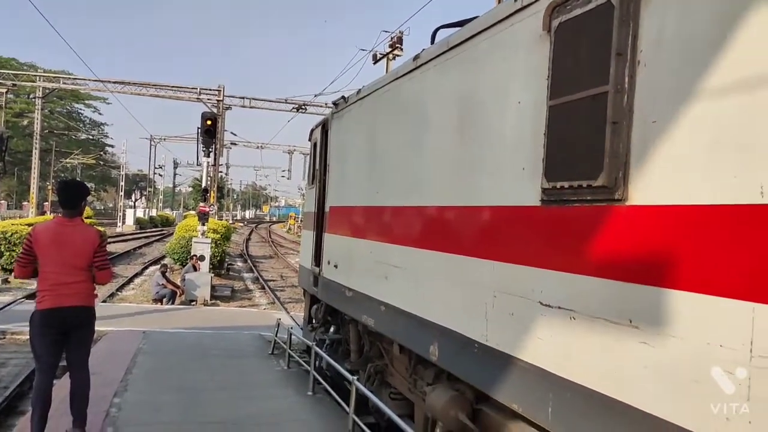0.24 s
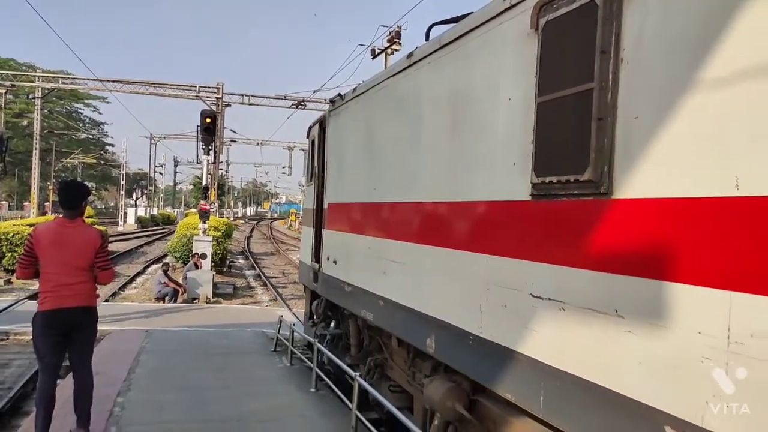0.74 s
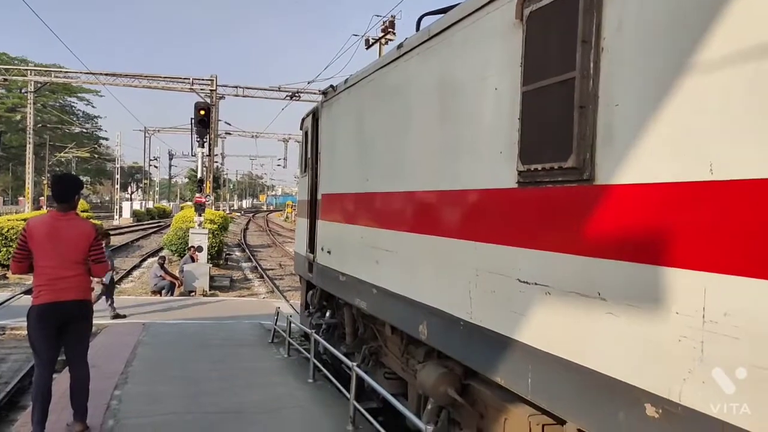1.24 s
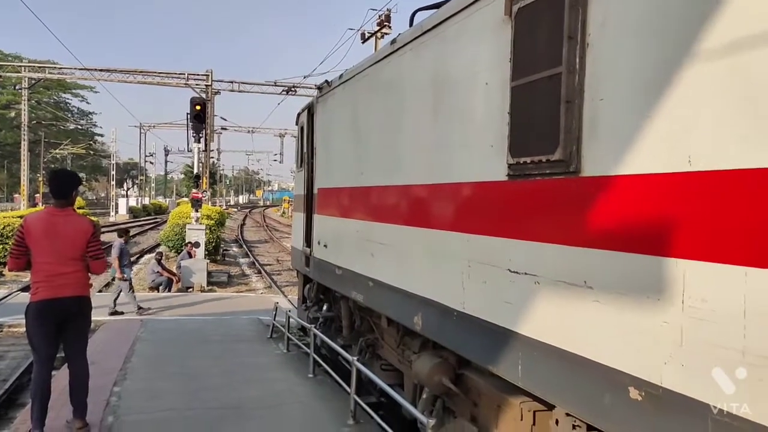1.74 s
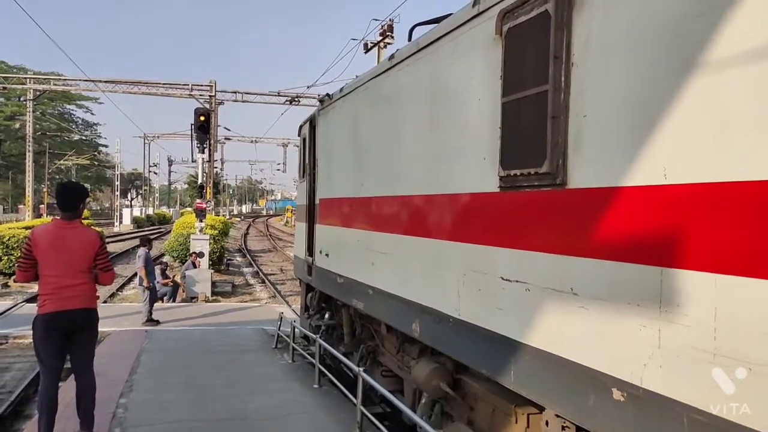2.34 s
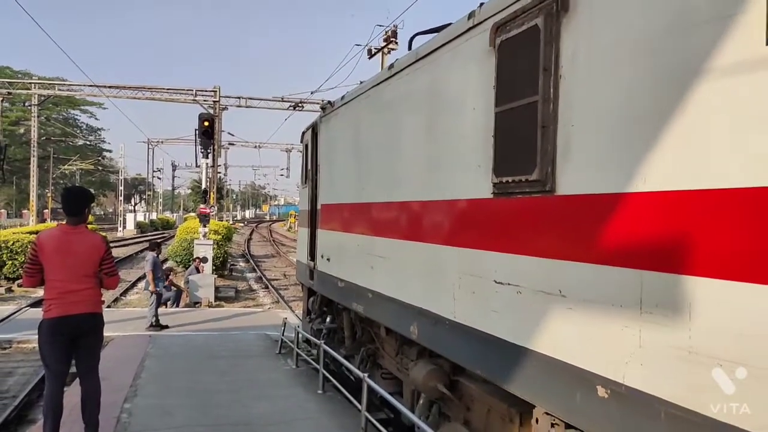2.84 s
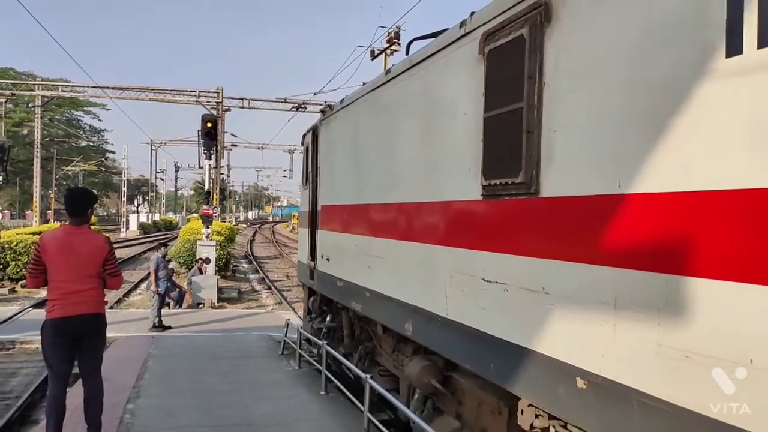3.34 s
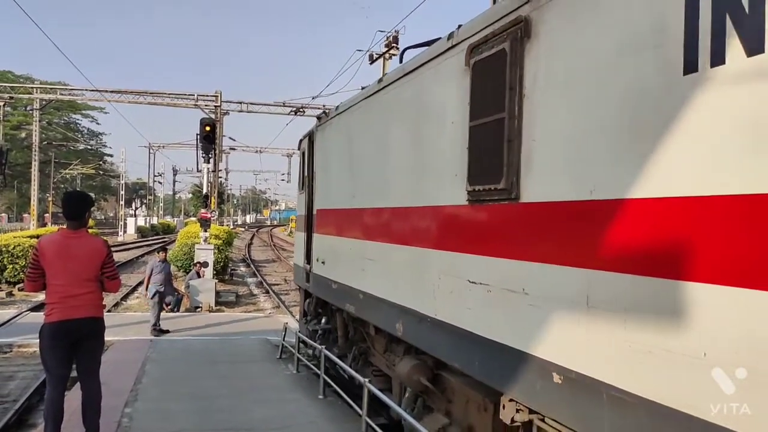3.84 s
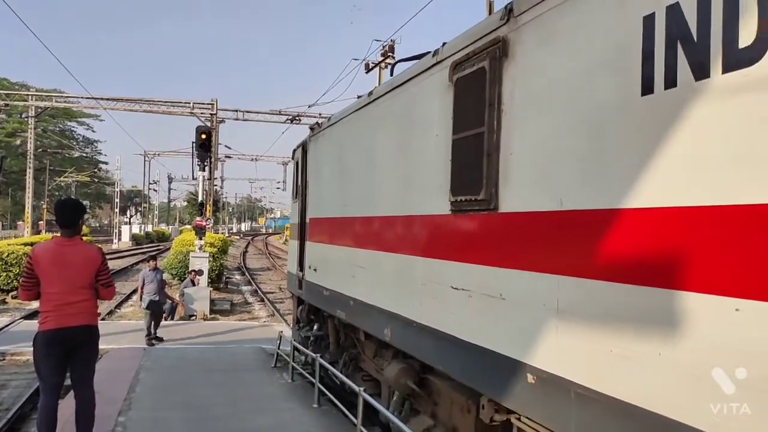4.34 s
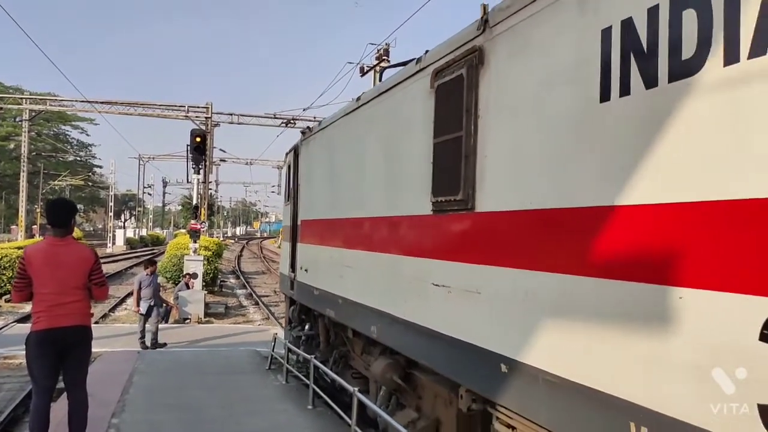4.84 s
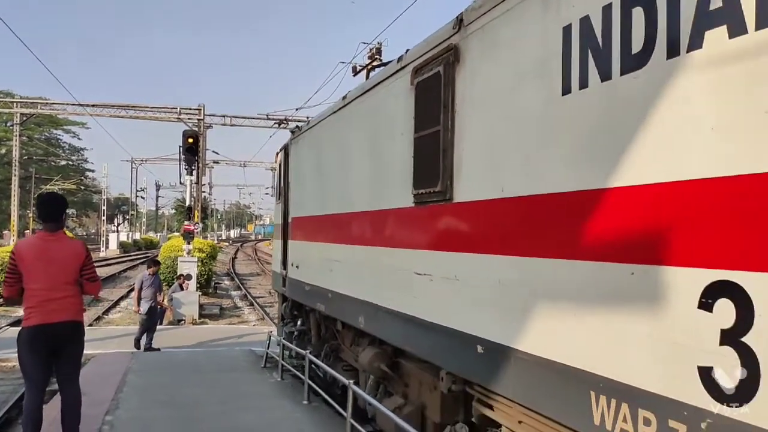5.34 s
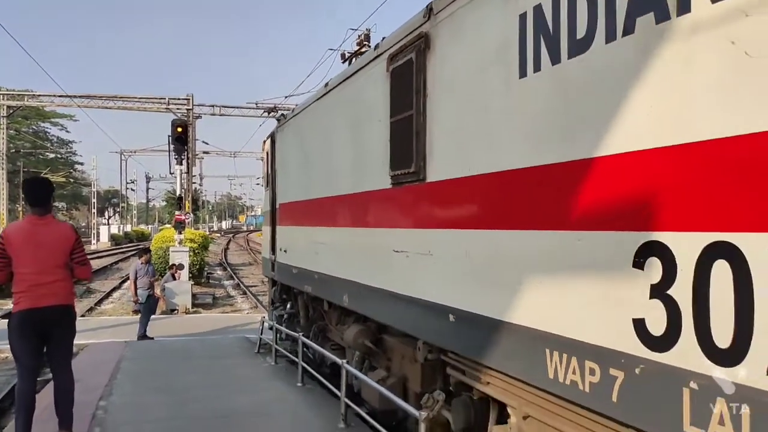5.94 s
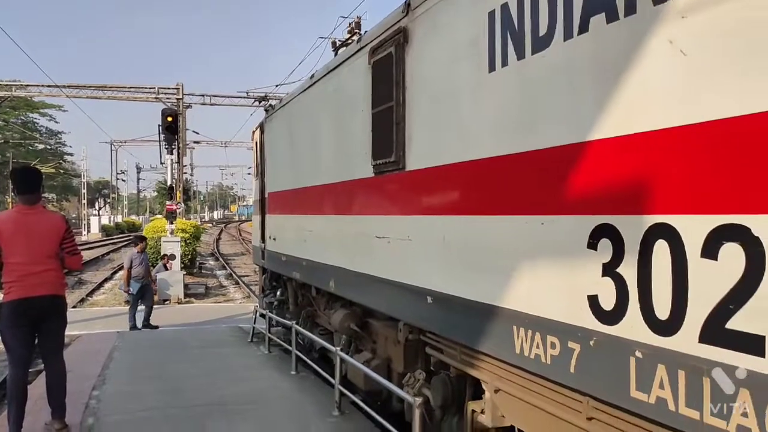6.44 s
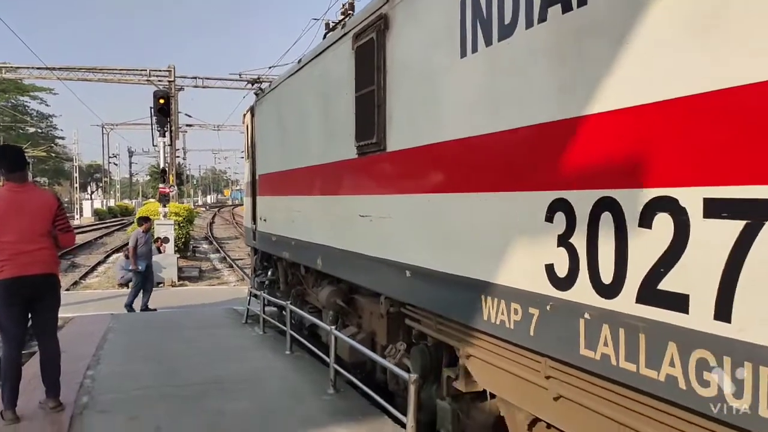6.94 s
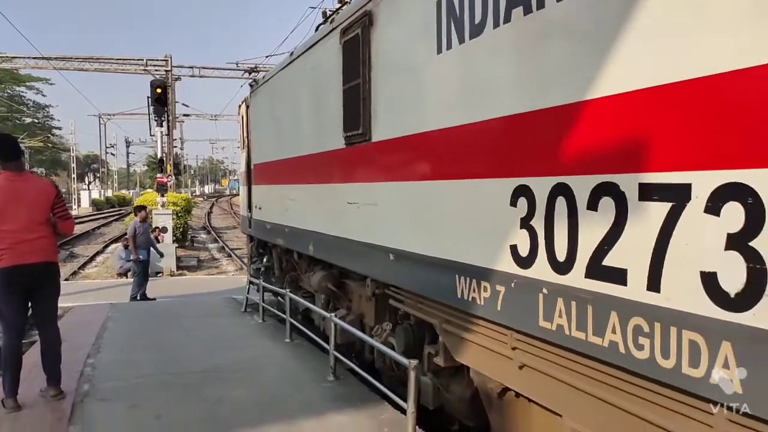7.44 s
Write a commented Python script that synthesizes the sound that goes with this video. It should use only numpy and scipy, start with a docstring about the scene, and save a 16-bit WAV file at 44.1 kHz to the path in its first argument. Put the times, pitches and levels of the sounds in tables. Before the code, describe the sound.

An electric locomotive rolls slowly by at arm's length, its cooling fans rushing and humming steadily, interrupted once by a brief spit of brake air.

```python
"""Blowers of an electric locomotive creeping past a platform, an arm's length away, in the open air.
They roar as coloured noise, with one wavering sine per blower for the blade tones.
Transformer and converter buzz on multiples of about 100 Hz; thin sine whistles lie above.
Brake pipework, in gated noise, leaks a swelling hiss, then spits one short puff.
A faint low rumble lies underneath."""
import sys
import numpy as np
from scipy import signal
from scipy.fft import rfft, irfft, next_fast_len
from scipy.io import wavfile

SR = 44100
rng = np.random.default_rng(int(sys.argv[2]) if len(sys.argv) > 2 else 0)


def dump(signal):
    """Clip the signal to [-1, 1] and save it as 16-bit WAV at the path in sys.argv[1]."""
    limited = np.clip(np.atleast_2d(signal).T, -1, 1)
    pcm = np.round(limited * 32767).astype(np.int16)
    wavfile.write(sys.argv[1], SR, pcm)


N = 338952
TIME = np.arange(N) / SR
SIZE = next_fast_len(N)
FREQS = np.maximum(np.arange(SIZE // 2 + 1) * SR / SIZE, 1)

# Noise spectra, scaled to rms 1 on use: freq_hz, relative_db_per_hz
# duct roar, grille rush, nearer outlet
ROAR_SPECTRUM = [(140, -62), (200, -43.5), (232, -30), (262, -17.5), (300, -6.5), (338, 1), (358, -1.6),
                 (392, -2.4), (440, -2.4), (500, -3.7), (580, -6.8), (650, -7), (730, -9.5), (950, -14.5),
                 (1600, -23.5), (4000, -60)]
RUSH_SPECTRUM = [(250, -40), (600, -2), (1000, 0), (1400, 0.4), (2000, -2.9), (2500, -9), (3000, -13),
                 (3500, -16.8), (4150, -15.9), (5300, -24.5), (7000, -17.3), (9500, -27.5), (12500, -34),
                 (15000, -29.5)]
OUTLET_SPECTRUM = [(160, -53), (290, -5), (368, 9.5), (410, 4), (700, -9.5), (1200, -16), (2200, 0.7),
                   (2800, -2), (3400, -8.5), (4200, -10), (5100, -26.5), (6700, -10), (9500, -25.5),
                   (15000, -44)]
# narrow duct resonance, brief roar surge
DUCT_MODE_SPECTRUM = [(200, -90), (310, -30), (350, -10), (368, 0), (385, -10), (450, -30), (1200, -100)]
SURGE_SPECTRUM = [(150, -80), (280, -12), (350, 0), (430, -1), (560, -12), (1000, -35), (3000, -85)]
# brake air: leak, its thin jet, puff, duller tail of the puff
LEAK_SPECTRUM = [(300, -70), (1700, -25), (2700, -1), (4000, -9), (5300, -13), (6500, -8), (7200, 2.5),
                 (8100, -2), (9000, -11), (12000, -19), (15000, -16.5)]
LEAK_JET_SPECTRUM = [(2000, -40), (5500, -8), (7500, 3), (9500, -2), (12000, -3), (15000, 2)]
PUFF_SPECTRUM = [(200, -60), (800, 0), (1400, 2), (2100, 5), (3400, -3.5), (4300, -1), (5200, -11),
                 (6400, -2), (7400, 4), (9500, -7.5), (12500, -10), (14000, -3.8), (14900, -.5),
                 (15700, -4)]
PUFF_TAIL_SPECTRUM = [(150, -60), (750, 0), (1400, 1), (2000, 6), (2500, 2.7), (3000, -1.5), (4300, -5.5),
                      (5200, -12), (6200, -6), (6800, -0.5), (8000, -8), (9500, -14), (12000, -19),
                      (15000, -22)]
# background rumble
RUMBLE_SPECTRUM = [(20, 3), (150, 0), (400, -20), (2000, -60)]

# Stereo pickup of noise: freq_hz, coherence (0-1)
COHERENCE = [(60, 0.97), (260, 0.95), (400, 0.69), (700, 0.6), (1200, 0.76), (1700, 0), (3000, 0),
             (5300, 0.3), (6500, 0.53), (8200, .9), (11000, 0.56), (14000, .1)]
# Stereo pickup of noise: freq_hz, left_minus_right_db
BALANCE = [(200, 0), (350, 1), (550, 0.8), (1000, 0.6), (1800, 6), (2500, 0.5), (3200, -4), (4300, 3),
           (5500, 0.5), (6500, 2.5), (7700, -2.5), (10000, 1), (12500, 1.5), (14500, 9)]

# Ducts and their resonance drawing level: nearest_s, peak_db, half_power_s
ROAR_PASS = (6.6, -26.6, 1.05)
DUCT_PASS = (6.25, -31.5, .6)
# Brief surges of the roar: peak_s, peak_db, half_power_s
SURGES = [(0.65, -32, .18), (6.14, -25.5, .025), (7.43, -23, .035)]

# Nearest blower's hum: time_s, level_db (before trim), left_minus_right_db, left_lead_rad
HUM_CURVE = [(0, -31, -5, 1.2), (0.3, -27, -4, 1.1), (0.48, -29.3, -4, 1.2), (0.85, -22.8, -2, 1.3),
             (1.1, -30, -2, 1.4), (1.4, -26.7, -1, 1.4), (1.55, -29, -1, 1.4), (1.73, -26.7, -1, 1.5),
             (2.1, -26.5, -1, 1.4), (2.3, -28.5, -1, 1.5), (2.64, -29.3, -4, 1.6), (2.87, -43, 0, 1.2),
             (3.23, -32, 1, .6), (3.33, -35, 2, .7), (3.43, -27.3, 3, 1), (3.6, -34, -1, .6),
             (3.8, -34, 1, .6), (3.97, -50, 0, 1.5), (4.5, -34, -5, .9), (4.68, -41, -4, .9),
             (4.8, -33, 0, 1.4), (5.1, -37, 4, 1.9), (5.78, -38, 2, 1.6), (5.88, -29.3, 0, 1.1),
             (6.12, -29.5, 0, 1.2), (6.3, -46, 0, 1.4), (6.8, -32, -3, 1.7), (7.3, -39, 2, .8),
             (7.65, -34, 2, .3)]
# Lowest blower's drone: time_s, level_db (before trim)
DRONE_CURVE = [(0, -43), (2.0, -54), (2.8, -38), (3.3, -36.5), (3.9, -38), (4.2, -46), (4.55, -38),
               (4.85, -33.8), (5.12, -32.3), (5.21, -34.5), (5.32, -31.5), (5.65, -30.5), (6.35, -38),
               (6.55, -33.5), (6.85, -31.3), (7.25, -38), (7.65, -38)]
# Blade tones of two more blowers: pitch_hz, left_minus_right_db, left_lead_rad
FANS = [(419.9, .2, .4), (440.2, 2.5, .4)]
# Their passes: nearest_s, peak_db (before trim), half_power_s, lobe_spacing_s, lobe_depth_db
FAN_PASSES = [(7.07, -29.5, 1.96, 2.57, 6.5), (6.3, -33.5, 5.7, 1.05, 5)]

# Magnetic buzz: multiples of twice the line frequency
BUZZ_ORDERS = [6, 7, 9, 11, 12, 13, 14, 15, 16, 17, 18, 19, 20, 21, 22, 23, 24, 25, 26, 30, 35]
# Their levels: level_db (before approach gain)
BUZZ_LEVELS = [-53, -54, -54, -57, -55, -57, -55.5, -57.5, -54.5, -56.5, -59, -57, -51.5, -52, -59, -58,
               -60, -59.5, -62.5, -61.5, -70]
# Strongest transformer harmonic: time_s, level_db, left_lead_rad
WHINE_CURVE = [(0, -50, 1.1), (.8, -54, 2.3), (1.3, -45.5, 2), (1.7, -47, 1.9), (1.9, -43.5, 1.4),
               (2.17, -40.5, 1.1), (2.45, -47, 1.6), (2.75, -44.5, 2.5), (3.1, -49, 2.4), (3.5, -42.5, 2),
               (4.3, -45, 2.6), (4.8, -52, 2.5), (5.3, -44.5, 2.5), (5.95, -48, 2.4), (6.42, -39.3, 1.6),
               (6.65, -42, 2.2), (6.82, -38, 2.7), (7.3, -37, 2.4), (7.65, -37.5, 2.6)]
# Power-electronics whistles: pitch_hz, phase_wander_rad, level_db (before approach gain)
WHISTLES = [(4001, 1.7, -67.5), (4997, 2.2, -71), (5996, 1.8, -72), (6997, 1.5, -70), (13996, 4, -83),
            (14995, 6, -79)]

# Brake air flows: opens_s, rise_s, hold_s, peak_db, fall_db_per_s
LEAK_FLOW = (1.58, .84, .05, -38, 240)
LEAK_JET_FLOW = (2.268, .012, .19, -47, 220)
PUFF_FLOW = (2.684, .062, .014, -27.4, 235)
PUFF_TAIL_FLOW = (2.715, .076, 0.022, -26.9, 145)
# Valve bore ringing: peak_s, half_power_s, pitch_hz, width_hz, peak_db, left_minus_right_db
PUFF_RINGS = [(2.718, .015, 7600, 1800, -38, -4), (2.752, .024, 14863, 200, -41.5, 4),
              (2.762, .016, 7480, 800, -37, -5), (2.8, .018, 6675, 130, -39, 1)]

ROAR_DB, RUSH_START_DB, RUSH_DB_PER_S = -25.8, -32, .12
OUTLET_START_DB, OUTLET_DB_PER_S = -58.4, 3.3
HUM_HZ, DRONE_HZ, BUZZ_HZ = 551.0, 282.5, 99.97
BRAKE_LEAD_MS = -.48  # negative: right leads
RUMBLE_DB = -83.5
CUTOFF_HZ = 15750


def blowers():
    """Turbulence: low duct roar, brighter grille rush, growing outlet, duct resonance and surges."""
    roar_gain = np.hypot(from_db(ROAR_DB), pass_by(*ROAR_PASS))
    throb = from_db(.7 * drift(30))
    roar = roar_gain * throb * air_noise(ROAR_SPECTRUM, lead_ms=.32)
    rush_db = RUSH_START_DB + RUSH_DB_PER_S * TIME + .75 * drift(24)
    rush = from_db(rush_db) * air_noise(RUSH_SPECTRUM, lead_ms=.34)
    outlet_db = OUTLET_START_DB + OUTLET_DB_PER_S * TIME
    outlet = from_db(outlet_db) * air_noise(OUTLET_SPECTRUM, lead_ms=.38)
    resonance = pass_by(*DUCT_PASS) * air_noise(DUCT_MODE_SPECTRUM, lead_ms=.3)
    surge_gain = sum(swell(*surge) for surge in SURGES)
    surges = surge_gain * air_noise(SURGE_SPECTRUM, lead_ms=.3)
    return roar + rush + outlet + resonance + surges


def blade_tones():
    """Blade passing: one wavering sine per blower."""
    waver_db, hum_trim_db, drone_trim_db, fans_trim_db = .9, -.1, -.3, -1.2
    hum_db, hum_balance_db, hum_lead_rad = in_time(HUM_CURVE)
    hum_gain = from_db(hum_db + hum_trim_db + waver_db * drift(10))
    hum = hum_gain * tone(HUM_HZ, hum_lead_rad, wander_rad=.55, sway_rad=.08)
    drone_gain = from_db(in_time(DRONE_CURVE) + drone_trim_db + waver_db * drift(10))
    drone = drone_gain * tone(DRONE_HZ, lead_rad=.62, wander_rad=.7)
    out = hum * panned(hum_balance_db) + drone * panned(1.1)
    for (hz, left_db, lead_rad), passing in zip(FANS, FAN_PASSES):
        gain = beamed(*passing) * from_db(fans_trim_db + waver_db * drift(10))
        out += gain * panned(left_db) * tone(hz, lead_rad, wander_rad=.81)
    return out


def buzz():
    """Transformer harmonics, part direct, part reflected between body and platform."""
    reflected_share, lead_ms = .55, .3
    out = np.zeros((2, N))
    for order, level_db in zip(BUZZ_ORDERS, BUZZ_LEVELS):
        hz = order * BUZZ_HZ
        direct = tone(hz, lead_rad=2 * np.pi * hz * lead_ms / 1000, wander_rad=1.0)
        reflected = np.array([scattered(hz, rate=7), scattered(hz, rate=7)])
        mix = np.sqrt(1 - reflected_share) * direct + np.sqrt(reflected_share) * reflected
        out += from_db(level_db) * mix
    return out * approach_gain()


def whine():
    """Strongest transformer harmonic, swelling and shifting between the ears."""
    level_db, lead_rad = in_time(WHINE_CURVE)
    gain = from_db(level_db + drift(8))
    return gain * panned(1.5) * tone(10 * BUZZ_HZ, lead_rad, wander_rad=.9)


def whistles():
    """Power electronics: thin sines with wandering phase."""
    out = np.zeros((2, N))
    for hz, wander_rad, level_db in WHISTLES:
        out += from_db(level_db) * tone(hz, lead_rad=np.pi / 2, wander_rad=wander_rad)
    return out * approach_gain()


def brake_air():
    """Escaping air, right side leading: uneven leak and thin jet, then a puff, duller tail and rings."""
    sputter = from_db(1.2 * drift(64))
    spit = from_db(1.0 * drift(90))
    leak = valve(*LEAK_FLOW) * air_noise(LEAK_SPECTRUM, BRAKE_LEAD_MS, left_db=-3.0, in_sight=.3)
    jet = valve(*LEAK_JET_FLOW) * air_noise(LEAK_JET_SPECTRUM, BRAKE_LEAD_MS, left_db=-3.0, in_sight=.3)
    puff = valve(*PUFF_FLOW) * air_noise(PUFF_SPECTRUM, BRAKE_LEAD_MS, left_db=-2.5, in_sight=.5)
    tail = valve(*PUFF_TAIL_FLOW) * air_noise(PUFF_TAIL_SPECTRUM, BRAKE_LEAD_MS, left_db=1.0, in_sight=.15)
    out = sputter * (leak + jet) + spit * (puff + tail)
    for peak_s, half_power_s, hz, width_hz, peak_db, left_db in PUFF_RINGS:
        out += swell(peak_s, peak_db, half_power_s) * panned(left_db) * scattered(hz, width_hz)
    return out


def rumble():
    """Faint, steady low noise."""
    return from_db(RUMBLE_DB) * air_noise(RUMBLE_SPECTRUM, lead_ms=.2)


def air_noise(spectrum, lead_ms, left_db=0, in_sight=0):
    """Stereo turbulence of rms 1: a direct part with a left lead, plus a diffuse part, less if in sight."""
    direct, *diffuse = rfft(rng.standard_normal((3, SIZE)))
    direct_share = np.clip(1 - (1 - at_hz(COHERENCE, FREQS)) * (1 - in_sight), 0, .99)
    lead_rad = 2 * np.pi * FREQS * lead_ms / 1000 * (FREQS < 5700)  # no lead above 5.7 kHz
    shifted = direct * np.exp([[.5j], [-.5j]] * lead_rad)
    pair = np.sqrt(direct_share) * shifted + np.sqrt(1 - direct_share) * np.array(diffuse)
    colour = from_db(at_hz(spectrum, FREQS)) * panned(at_hz(BALANCE, FREQS) + left_db)
    return rms_one(irfft(pair * colour, SIZE)[:, :N])


def tone(hz, lead_rad, wander_rad, sway_rad=.25):
    """Stereo sine of rms 1; its phase wanders as the paths to the listener change."""
    phase = 2 * np.pi * (hz * TIME + rng.random()) + wander_rad * drift(1.954)
    lead = lead_rad + sway_rad * drift(3)
    return np.sqrt(2) * np.sin(phase + np.array([[.5], [-.5]]) * lead)


def scattered(hz, rate):
    """Tone over many changing paths, fading in and out; rms about 1."""
    phase = 2 * np.pi * hz * TIME
    return drift(rate) * np.cos(phase) + drift(rate) * np.sin(phase)


def pass_by(nearest_s, peak_db, half_power_s):
    """Gain of a source passing at steady speed: one over distance."""
    return from_db(peak_db) / np.hypot(1, (TIME - nearest_s) / half_power_s)


def beamed(nearest_s, peak_db, half_power_s, lobe_s, lobe_db):
    """Gain of a passing tone whose lobes sweep over the listener."""
    dip_db = lobe_db * np.sin(np.pi * (TIME - nearest_s) / lobe_s) ** 2
    return pass_by(nearest_s, peak_db, half_power_s) * from_db(-dip_db)


def approach_gain():
    """Stereo gain, left favoured, rising 4.5 dB as the source nears."""
    return panned(4.0) * from_db(4.5 * (TIME / TIME[-1] + .5))


def swell(peak_s, peak_db, half_power_s):
    """Gain of a brief, rounded swell."""
    return from_db(peak_db - np.minimum(3 * ((TIME - peak_s) / half_power_s) ** 2, 200))


def valve(opens_s, rise_s, hold_s, peak_db, fall_db_per_s):
    """Gain of escaping air: opening widens evenly, holds, then flow dies away."""
    age_s = TIME - opens_s
    fall_s = np.clip(age_s - rise_s - hold_s, 0, 1)
    return np.clip(age_s / rise_s, 0, 1) * from_db(peak_db - fall_db_per_s * fall_s)


def panned(balance_db):
    """Left and right gains of mean power 1."""
    gains = from_db(np.array([[.5], [-.5]]) * balance_db)
    return gains / np.sqrt(np.mean(gains ** 2, axis=0))


def drift(rate):
    """Smooth random curve, about `rate` turns a second, spread about 1."""
    steps = int(N / SR * rate) + 8
    slow = signal.resample(rng.standard_normal(steps), steps * 10)
    return np.interp(TIME * rate * 10, np.arange(len(slow)), rms_one(slow))


def in_time(rows):
    """Columns of a time curve at every sample."""
    time_s, *columns = np.transpose(rows)
    return np.array([np.interp(TIME, time_s, column) for column in columns])


def at_hz(points, hz):
    """Table read on a log-frequency axis."""
    freq_hz, value = np.transpose(points)
    return np.interp(np.log(hz), np.log(freq_hz), value)


def from_db(db):
    """Decibels to gain."""
    return 10 ** (np.asarray(db) / 20)


def rms_one(x):
    """Scale to rms 1."""
    return x / np.sqrt(np.mean(np.abs(x) ** 2) + 1e-20)


def scene():
    """Locomotive over a faint low rumble."""
    return blowers() + blade_tones() + buzz() + whine() + whistles() + brake_air() + rumble()


def record(dry):
    """Ease both ends over 4 ms and cut the top steeply."""
    ease = np.clip(np.minimum(TIME, TIME[-1] - TIME) / .004, 0, 1)
    low_pass = signal.ellip(16, .1, 70, CUTOFF_HZ, fs=SR, output="sos")
    return signal.sosfilt(low_pass, dry * ease)


dry = scene()
out = record(dry)
dump(out)
```